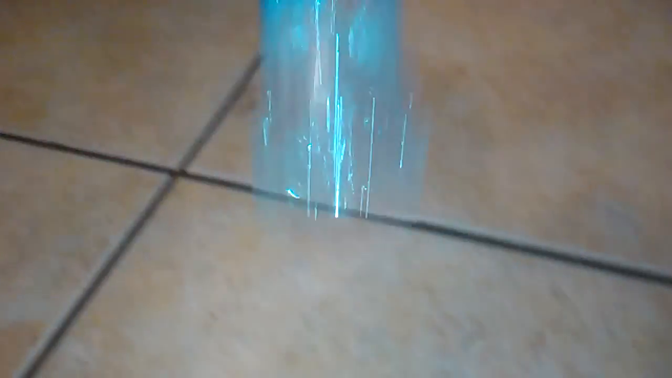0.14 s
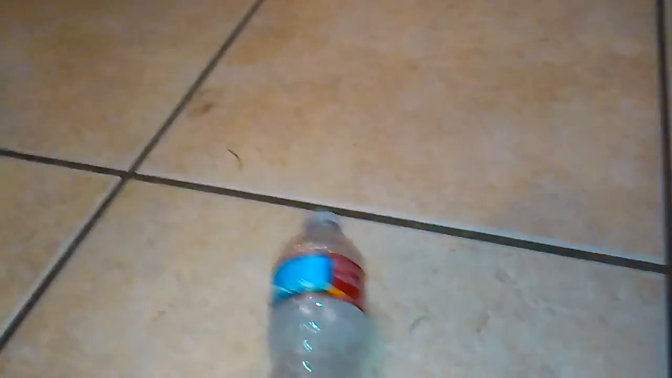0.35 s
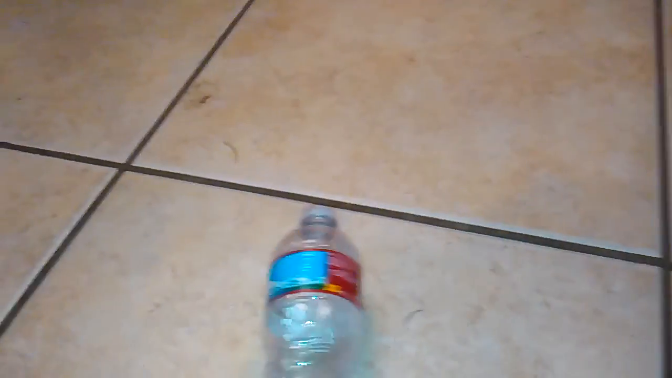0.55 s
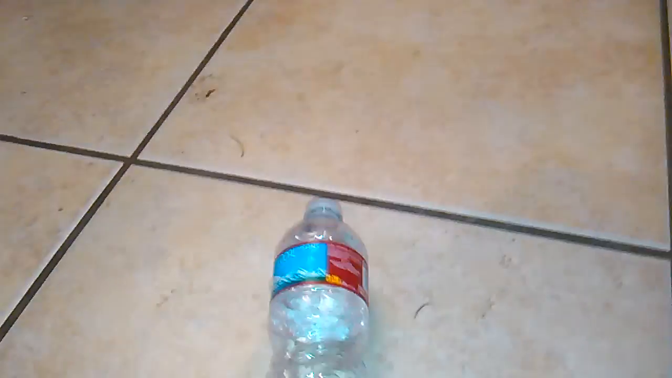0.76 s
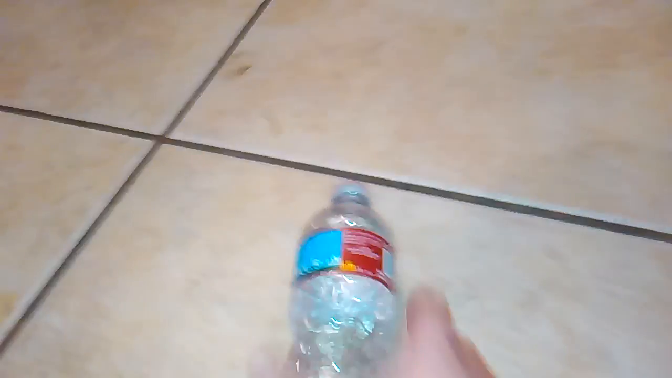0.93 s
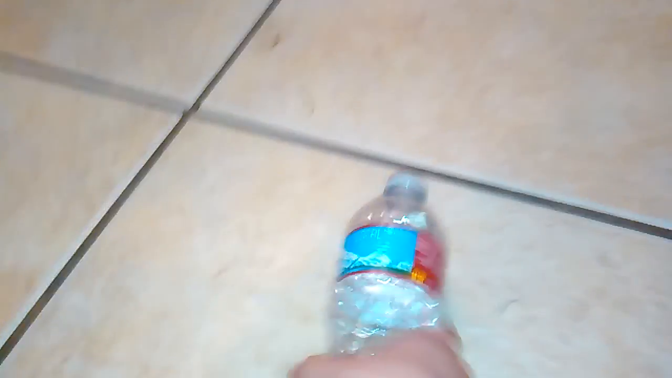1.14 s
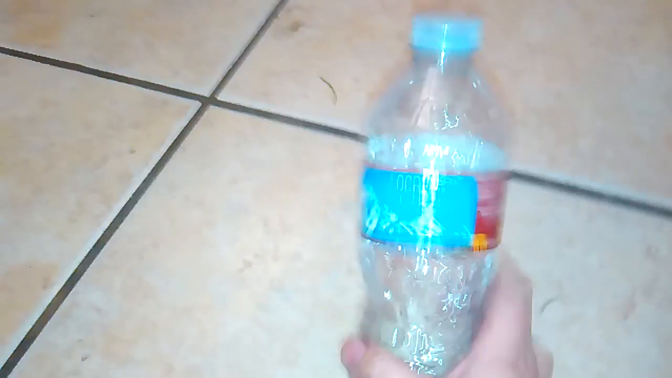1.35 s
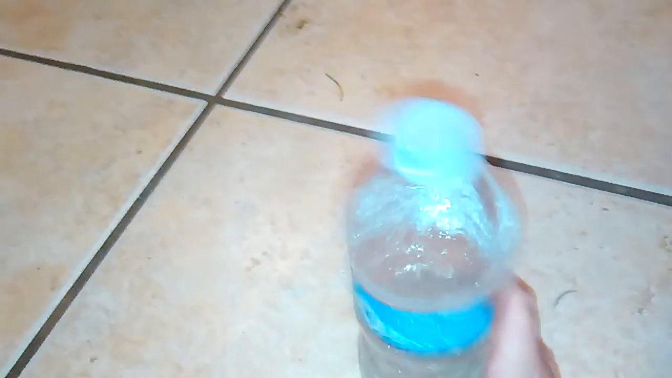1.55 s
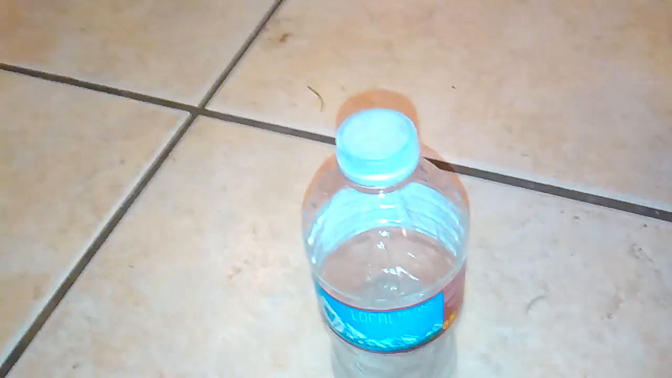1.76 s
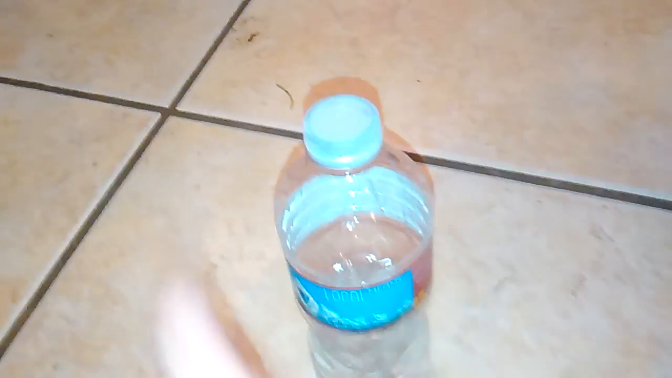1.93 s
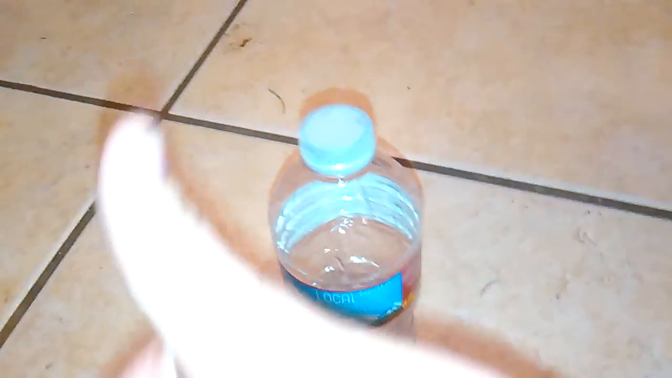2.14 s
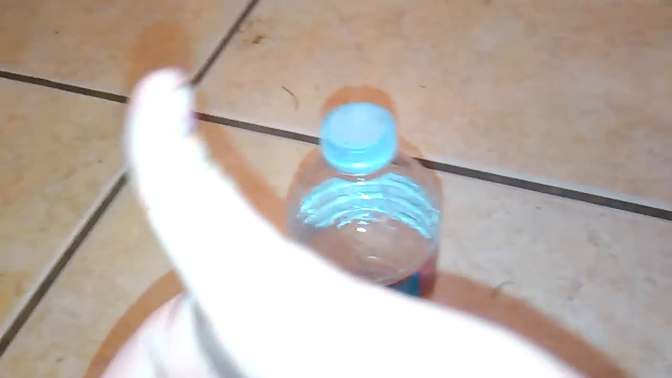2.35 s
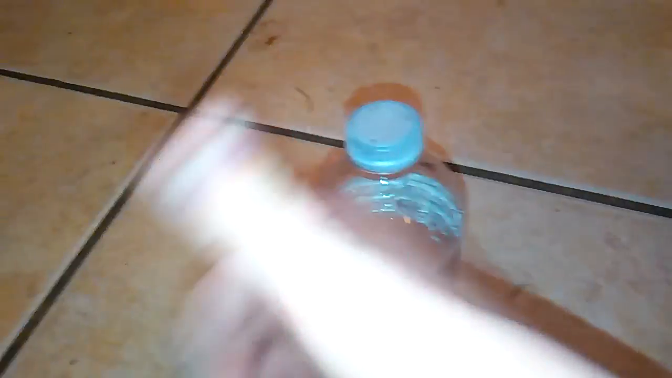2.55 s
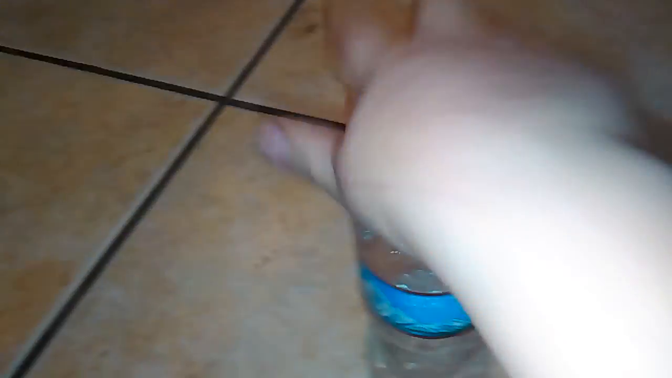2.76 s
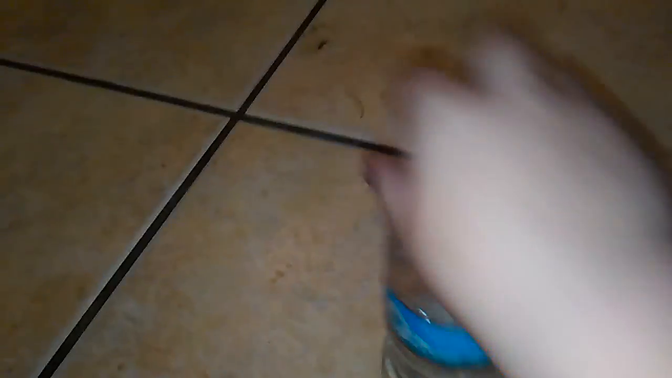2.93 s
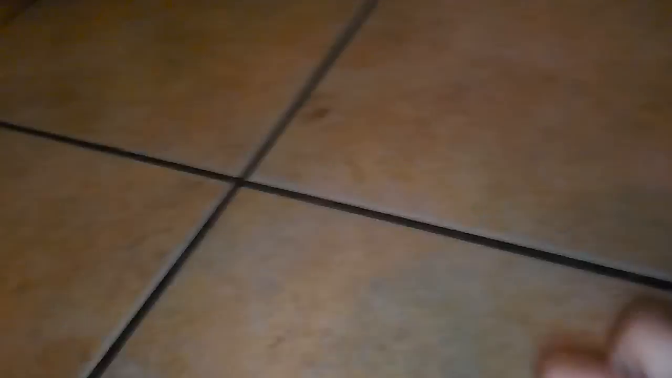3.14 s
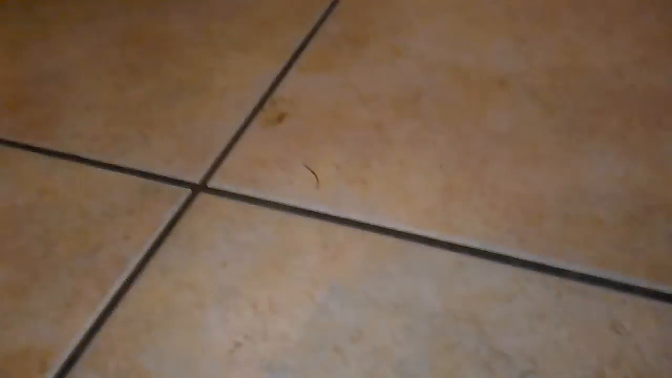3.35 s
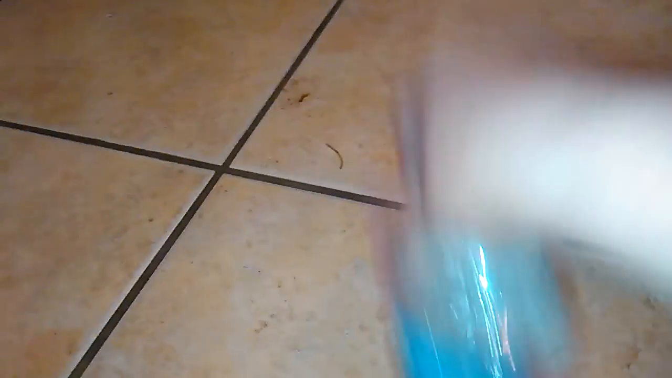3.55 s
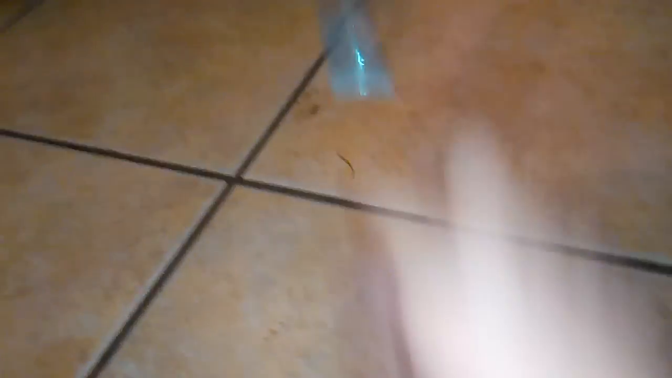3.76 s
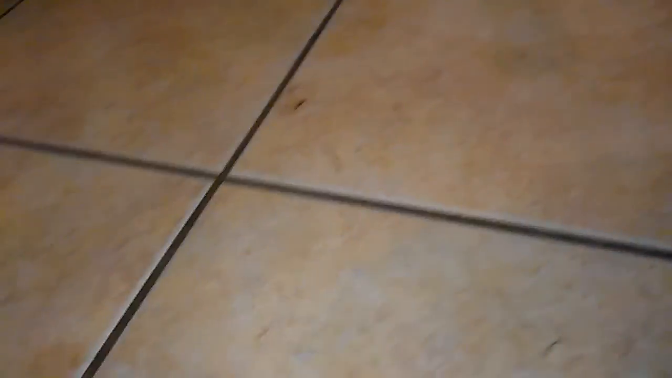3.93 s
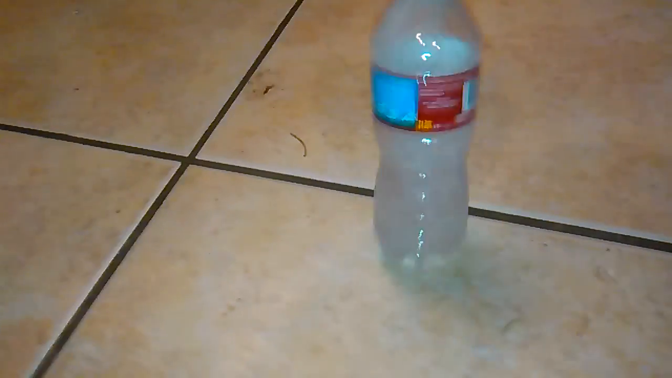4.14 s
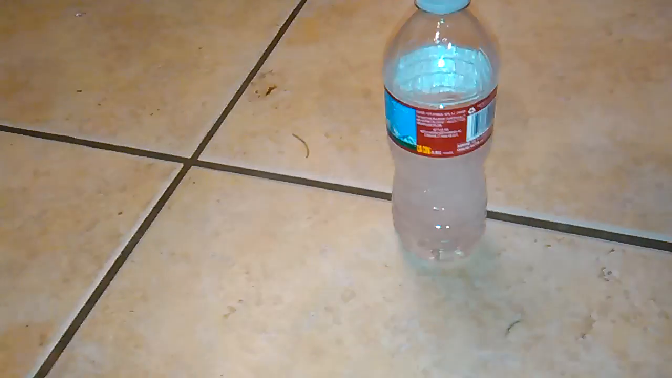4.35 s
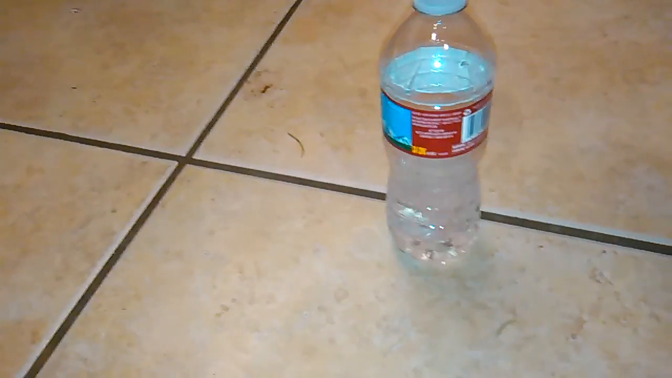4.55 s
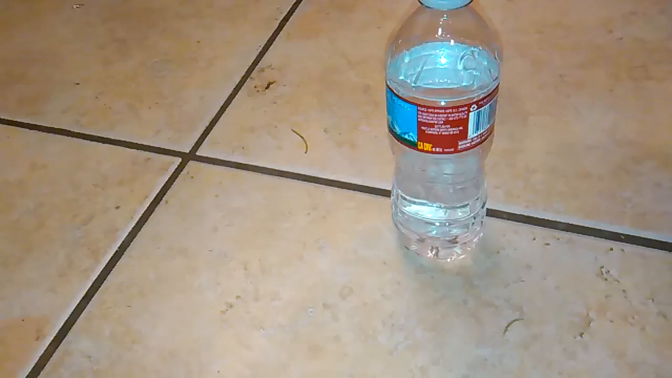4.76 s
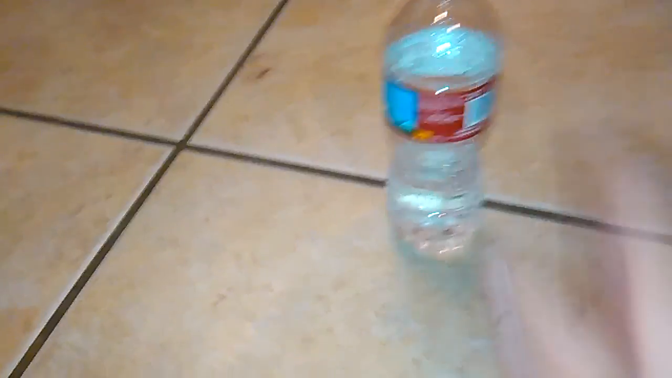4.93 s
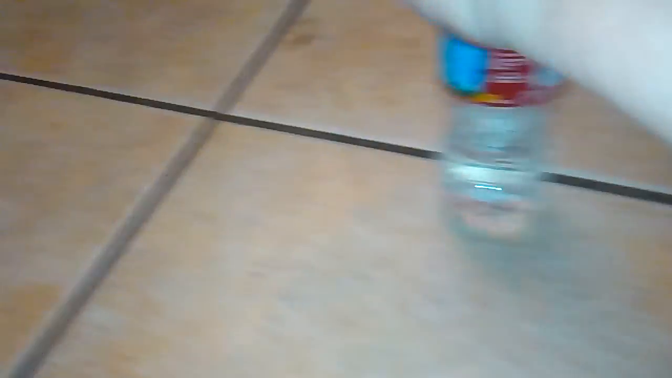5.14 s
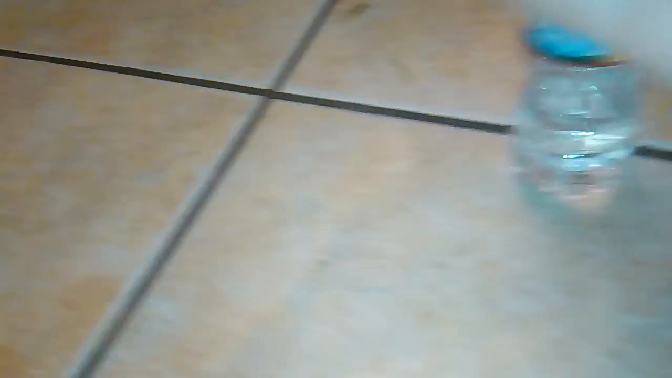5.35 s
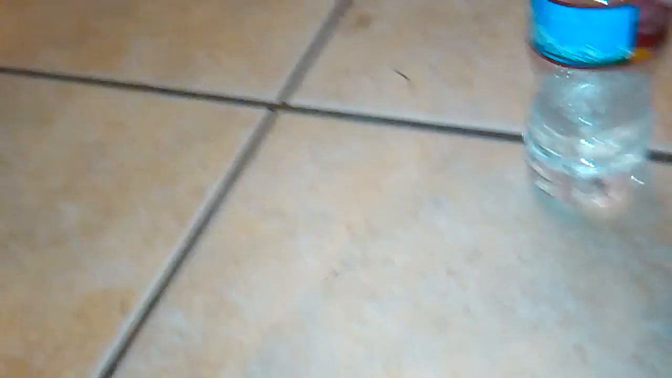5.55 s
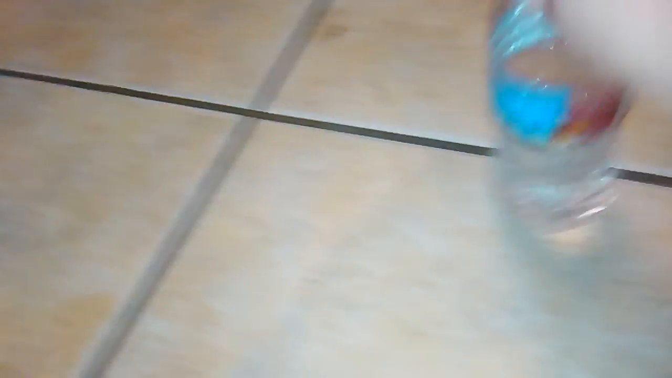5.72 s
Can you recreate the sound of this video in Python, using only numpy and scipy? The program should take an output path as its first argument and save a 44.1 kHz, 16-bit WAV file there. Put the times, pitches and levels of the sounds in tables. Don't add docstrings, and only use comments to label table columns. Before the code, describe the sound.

Two loud bottle landings on a tile floor, each a quick cluster of bounces, separated by soft bumps, crinkles and low room hum.

```python
import sys
import numpy as np
from scipy import signal
from scipy.fft import rfft, irfft
from scipy.io import wavfile

SR = 44100
rng = np.random.default_rng(int(sys.argv[2]) if len(sys.argv) > 2 else 0)


def transcribe(signal):
    frames = np.atleast_2d(signal).T
    limited = np.clip(frames, -1, 1)
    pcm = np.round(limited * 32767).astype(np.int16)
    wavfile.write(sys.argv[1], SR, pcm)


def field_ratio(decibels):
    return 10 ** (np.asarray(decibels, dtype=float) / 20)


N = 259749

# (frequency [Hz], left-right likeness [-1 to 1])
PORT_LIKENESS = [(60, 0.91), (130, 0.93), (290, 0.73), (620, 0.25), (1360, 0.03), (2980, -0.02),
                 (6500, -0.04), (14200, 0.01)]
# (frequency [Hz], density [dB per Hz])
CRACK_SPECTRUM = [(1000, -27), (1600, 1), (3000, -6.5), (4600, -12.5), (6300, -10.5), (8500, -8.5),
                  (11000, -12.5), (14500, -21)]
# (frequency [Hz], gain [dB])
HAND_SHADOW = [(60, -3.5), (200, -1), (400, -4), (700, -10), (1250, -14), (2300, -13), (4200, -9.5),
               (6000, -17), (7700, -26.5), (14000, -25.5)]


def rms_one(x):
    return x / np.sqrt(np.mean(x ** 2) + 1e-20)


def at_hz(points, hz):
    table = np.array(points)
    return np.interp(np.log(hz), np.log(table[:, 0]), table[:, 1])


def coloured(x, points):
    size = 4096
    bins_hz = np.maximum(np.arange(size // 2 + 1) * SR / size, 1)
    cepstrum = irfft(np.log(field_ratio(at_hz(points, bins_hz))))
    cepstrum[1:size // 2] *= 2
    cepstrum[size // 2 + 1:] = 0
    response = irfft(np.exp(rfft(cepstrum)))[:size // 2]
    return signal.fftconvolve(x, response)[:len(x)]


def butterworth(x, order, hz, kind):
    return signal.sosfilt(signal.butter(order, hz, kind, fs=SR, output="sos"), x)


def drift(rate_hz):
    r = np.exp(-80 * np.pi * rate_hz / SR)
    slow = signal.lfilter([1], [1, -2 * r, r * r], rng.standard_normal(N // 40 + 2002))[2000:]
    return np.interp(np.arange(N) / 40, np.arange(len(slow)), rms_one(slow))


def ring(clicks, hz, t60):
    r = field_ratio(-60 / (t60 * SR))
    w = 2 * np.pi * hz / SR
    return signal.lfilter([0, np.sin(w)], [1, -2 * r * np.cos(w), r * r], clicks + 1e-18)


def grains(per_s, size_db, clump_db):
    sizes = field_ratio(size_db * np.minimum(rng.exponential(1, N), 4)) * rng.choice([-1, 1], N)
    return sizes * (rng.random(N) < per_s * field_ratio(clump_db * drift(25)) / SR)


def swell(t, middle_s, length_s):
    return np.cos(np.pi * np.clip((t - middle_s) / length_s, -.5, .5))


def add(out, s, piece):
    i = round(s * SR)
    out[i:i + len(piece)] += piece[:N - i]


def rumble(patchy_db=3.0):
    # (frequency [Hz], density [dB per Hz])
    rumble_spectrum = [(15, -46), (25, -15), (59, -2), (91, -10.5), (101, -7), (124, -11), (147, -15),
                       (186, -8), (278, -21.5), (307, -16.5), (476, -23.5), (573, -24.5), (1400, -34),
                       (1820, -68.5), (3080, -120)]
    # (frequency [Hz], left minus right [dB])
    rumble_lean = [(60, 3), (110, -2.5), (200, -2.5), (370, -4.5), (680, -3.5), (1250, -6.5), (2290, -2.5),
                   (4210, -2), (7730, -10.5), (14200, -4)]
    out = 0
    edges = 25 * 2 ** np.arange(0, 6.6, .5)
    white = rng.standard_normal((2, 2, N))
    for k, (low, high) in enumerate(zip(edges, edges[1:])):
        mid, side = butterworth(white[k % 2], 2, [low, high], "band")
        hz = np.sqrt(low * high)
        alike = np.clip(at_hz(PORT_LIKENESS, hz), 0, 1)
        lean_db = at_hz(rumble_lean, hz) * np.array([[.5], [-.5]])
        gain = field_ratio(at_hz(rumble_spectrum, hz) + patchy_db * alike * drift(5) + lean_db)
        out = out + gain * (np.sqrt(1 + alike) * mid + np.sqrt(1 - alike) * side * [[1], [-1]])
    return field_ratio(-67.5) * rms_one(out)


def mains_hum(waver_db=2.5, waver_hz=5.0):
    # (frequency [Hz], level [dB rms])
    harmonics = [(59.5, -69.5), (119.5, -70.5), (180, -84)]
    t, hum = np.arange(N) / SR, 0
    for hz, db in harmonics:
        hum = hum + field_ratio(db + 1.5 + waver_db * drift(waver_hz)) * np.sin(2 * np.pi * hz * t)
    return hum * field_ratio([[-1.1], [1.1]])


def capsule_hiss():
    # (frequency [Hz], density [dB per Hz])
    hiss_spectrum = [(820, -32.5), (1400, -2), (1470, -11), (1820, -0.5), (2980, -3.5), (6480, -8.5),
                     (8330, -3), (14200, -3.5)]
    return np.array([field_ratio(-75) * rms_one(coloured(rng.standard_normal(N), hiss_spectrum)) for port in "LR"])


def all_contacts():
    # (time [s], wall [dB], base [dB], base pitch [Hz], crack [dB])
    landings = [
        (0.3195, -10, -18.5, 108, -30),
        (0.328, -16, -21, 180, -31.5),
        (0.348, -19.5, -20, 217, -39.5),
        (0.369, -15, -22.5, 163, -31),
        (0.378, -25, -27.5, 208.8, -33),
        (4.2125, -17, -12.5, 126.4, -40.5),
        (4.2165, -17.5, -16.5, 88, -22.5),
        (4.224, -9.5, -19, 203, -33.5),
        (4.235, -21, -21.5, 258, -32),
        (4.257, -31.5, -29, 80.6, -44),
    ]
    # (time [s], wall [dB], base [dB], base pitch [Hz], crack [dB])
    knocks = [(0.1, -51.5, -57.5, 116, -64), (0.124, -43.5, -59.5, 132, -53),
              (0.151, -58.5, -71.5, 110.4, -60), (0.233, -59, -63, 80.7, -64.5),
              (1.504, -41.5, -31.5, 326, -57.5), (1.514, -35, -31, 126.6, -66.5),
              (1.534, -41.5, -41, 203, -57), (1.612, -49, -64, 127, -67), (1.637, -50.5, -55, 218, -55.5),
              (1.666, -48.5, -66, 121.5, -59), (2.702, -43.5, -38, 282.5, -69.5),
              (2.719, -38, -32.5, 223, -58), (2.859, -44.5, -41.5, 217, -61),
              (2.873, -34.5, -44, 172, -58.5), (3.824, -38, -33, 194, -62), (3.99, -35, -41, 95.9, -47.5),
              (4.031, -30, -47, 99.6, -46.5), (4.04, -37, -46, 105, -58), (5.525, -52, -41.5, 362, -71),
              (5.532, -36, -31.5, 363, -69), (5.605, -58, -45, 296, -71), (5.785, -29.5, -50.5, 233, -32.5),
              (5.805, -39.5, -43, 229, -53)]
    # (time [s], base [dB], base pitch [Hz])
    bumps = [
        (0.001, -46.5, 213),
        (2.009, -54, 130.4),
        (3.041, -45, 245),
        (5.281, -56, 253.6),
        (5.471, -50, 161),
    ]
    rows = landings + knocks + [(s, db - 25, db, hz, db - 28.5) for s, db, hz in bumps]
    hardest_hz, softer_db_per_octave = 1400, 26.0
    contacts_with_pitch = []
    for s, wall_db, base_db, base_hz, crack_db in rows:
        wall_hz = hardest_hz * 2 ** ((crack_db - wall_db) / softer_db_per_octave)
        contacts_with_pitch.append((s, wall_db, base_db, base_hz, wall_hz, crack_db))
    return contacts_with_pitch


def contacts(base_t60=0.06, wall_t60=0.017, crack_s=0.0054, spray_s=0.017, spray_db=-14):
    # (frequency [Hz], level below the base [dB], t60 [s])
    base_modes = [(59.55, -3.5, 0.37), (80.5, -4.5, 0.21), (139, -9.5, 0.067), (188.4, -4, 0.16),
                  (263, -7, 0.02), (319.44, -6.5, 0.014)]
    # (frequency [Hz], level below the wall [dB], t60 [s])
    wall_modes = [(404, -6, .05), (455, -4, .06), (560, -11, .04), (655, -8, .04), (817, -6, .04),
                  (958, -8, .035), (1095, -6, .035), (1180, -6, .035), (1310, -8, .03), (1830, -17, .02),
                  (2150, -19, .015)]
    spread_db, focus_db, thin_db = 5.5, 5.5, 4.5
    counts = [len(base_modes), len(wall_modes)]
    is_wall = np.repeat([0, 1], counts)[:, None]
    body, crack, t = np.zeros(N), np.zeros(N), np.arange(SR // 4) / SR
    for s, wall_db, base_db, base_hz, wall_hz, crack_db in all_contacts():
        modes = [(base_hz, base_db + 2.5, base_t60), (wall_hz, wall_db + 6.5, wall_t60)]
        modes += [(hz, base_db + db - 4, t60) for hz, db, t60 in base_modes]
        modes += [(hz, wall_db + db, t60) for hz, db, t60 in wall_modes]
        hz, db, t60 = np.transpose(modes)[:, :, None]
        own_hz = np.repeat([base_hz, wall_hz], counts)[:, None]
        db[2:] += spread_db * rng.standard_normal((sum(counts), 1))
        db[2:] -= focus_db * np.abs(np.log2(hz[2:] / own_hz))
        db[2:] -= thin_db * np.maximum(np.log2(wall_hz / hz[2:]), 0) * is_wall
        hz[2:] *= 1 + .025 * rng.standard_normal((sum(counts), 1))
        swing = -np.sum(field_ratio(db - 60 * t / t60) * np.sin(2 * np.pi * hz * t), axis=0)
        add(body, s, swing * (1 - np.exp(-(t / 0.0015) ** 2)))
        decay = np.exp(-t / crack_s) + field_ratio(spray_db) * np.exp(-t / spray_s)
        add(crack, s, field_ratio(crack_db) * rng.standard_normal(len(t)) * np.minimum(t / 0.00021, 1) * decay)
    unit = np.std(coloured(rng.standard_normal(SR), CRACK_SPECTRUM))
    return body + field_ratio(3.0) * coloured(crack, CRACK_SPECTRUM) / unit


def dying(t, late_s, t60):
    t = np.maximum(t, 0)
    return (1 - np.exp(-(t / late_s) ** 2)) * field_ratio(-60 * t / t60) ** 2


def agitation():
    # (middle [s], length [s], slosh [dB], crackle [dB])
    stirs = [(0.08, 0.21, -71, -69), (0.244, 0.27, -67, -79), (0.392, 0.12, -38.5, -43),
             (0.441, 0.049, -41, -65), (0.698, 0.29, -75, -73.5), (1.147, 0.34, -65.5, -73),
             (1.441, 0.24, -75, -72.5), (1.653, 0.11, -58.5, -61.5), (1.732, 0.086, -62.5, -64.5),
             (1.541, 0.11, -49.5, -54), (3.042, 0.25, -65.5, -83), (3.82, 0.18, -60.5, -67.5),
             (3.95, .12, -64, -75.5), (4.15, 0.3, -76, -77.5), (4.4, 0.265, -53, -67.5),
             (4.52, 0.23, -65, -75.5), (5.3, .16, -77.5, -79), (5.46, 0.24, -62.5, -77),
             (5.585, 0.24, -53, -73), (5.776, 0.073, -60.5, -78), (5.87, 0.09, -63, -93)]
    t, power = np.arange(0, N + 64, 32) / SR, 0
    for s, wall_db, base_db, _, _, crack_db in all_contacts():
        blow_db = max(wall_db - 11, base_db)
        slosh = field_ratio(blow_db - 11.5) ** 2 * dying(t - s, 0.0064, 0.21)
        crackle = field_ratio(crack_db - 16) ** 2 * dying(t - s, .01, 0.28)
        power = power + np.array([slosh, crackle])
    for s, length, slosh_db, crackle_db in stirs:
        power = power + (field_ratio([[slosh_db], [crackle_db]]) * swell(t, s, length)) ** 2
    return [np.interp(np.arange(N) / SR, t, np.sqrt(p)) for p in power]


def slosh_and_crackle():
    # (frequency [Hz], density [dB per Hz])
    slosh_spectrum = [(150, -28.5), (250, -10), (420, -6.5), (700, -10), (950, -14.5), (1250, -13),
                      (1600, -27.5), (2800, -26), (4500, -64), (7700, -110)]
    slosh, crackle = agitation()
    knocks = grains(2500, size_db=3.5, clump_db=3.5)
    dealt = rng.integers(0, 14, N)
    rings = 0
    for k, hz in enumerate(np.geomspace(280, 3000, 14)):
        rings = rings + np.sqrt(hz) * ring(knocks * (dealt == k), hz, 14.0 / hz)
    water = coloured(rings, slosh_spectrum)
    creases = coloured(grains(6000, size_db=8.0, clump_db=4.5), CRACK_SPECTRUM)
    creases = butterworth(creases, 2, 4500, "high")
    return field_ratio(-5.5) * slosh * rms_one(water) + field_ratio(-2.5) * crackle * rms_one(creases)


def rubs(per_s=700, cycles=22.0):
    # (middle [s], length [s], level [dB])
    strokes = [
        (0.106, 0.067, -67),
        (1.535, .1, -66.5),
        (1.639, 0.055, -59),
        (1.741, 0.051, -60),
        (2.721, 0.048, -63),
        (2.865, 0.034, -82),
        (4.045, 0.074, -63),
        (5.535, 0.039, -64.5),
    ]
    rib_pitches = [1782, 2065, 2180, 2660]
    t, level, rings = np.arange(N) / SR, 0, 0
    for s, length, db in strokes:
        level = level + field_ratio(db) * swell(t, s, length)
    slips = grains(per_s, size_db=4.0, clump_db=7.5)
    dealt = rng.integers(0, len(rib_pitches), N)
    for k, hz in enumerate(rib_pitches):
        rings = rings + ring(slips * (dealt == k), hz, cycles / hz)
    return level * rms_one(rings)


def ticks(length_s=0.0042):
    # (time [s], peak [dB], pitch [Hz])
    snaps = [(0.08, -49.5, 10900), (0.093, -53, 6850), (0.111, -48, 8700), (0.2027, -63, 9400),
             (0.2209, -59, 4200), (0.671, -55.5, 9150), (0.6984, -64, 5870), (1.1657, -59.5, 10600),
             (1.2442, -68.5, 8150), (1.416, -62, 10340), (1.486, -61, 6240), (1.521, -41.5, 8860),
             (1.566, -48, 8500), (1.6229, -44.5, 8900), (1.6918, -75, 8820), (1.722, -55, 7680),
             (1.8123, -51, 11350), (2.85, -48, 8300), (3.6374, -68, 9750), (3.7006, -58.5, 6840),
             (3.936, -64.5, 6980), (3.9726, -66, 8900), (4.06, -60, 9350), (4.38, -61, 10240),
             (4.49, -56.5, 7520), (4.5301, -60, 8990), (4.8866, -73, 8330), (5.655, -54.5, 7940),
             (0.4145, -33.5, 4220), (4.493, -60, 2440)]
    out, t = np.zeros(N), np.arange(SR // 50) / SR
    for s, peak_db, hz in snaps:
        burst = rng.standard_normal(len(t)) * np.exp(-t / length_s)
        tick = ring(ring(burst, hz, 9.0 / hz), hz, 9.0 / hz)
        add(out, s, field_ratio(peak_db + 2.5) * tick / np.abs(tick).max())
    return out


def gulps():
    # (time [s], peak [dB], start pitch [Hz], end pitch [Hz], length [s])
    pockets = [
        (0.22, -76.5, 4780, 3970, 0.0071),
        (3.744, -71, 762, 810, 0.042),
        (3.775, -54, 670, 1211, 0.023),
        (5.426, -76, 2830, 2710, 0.077),
    ]
    out = np.zeros(N)
    for s, peak_db, start_hz, end_hz, length in pockets:
        hz = np.linspace(start_hz, end_hz, round(length * SR))
        rough = 1 + 2.5 * np.interp(np.arange(len(hz)) / 90, np.arange(60), rng.standard_normal(60))
        tone = np.sin(2 * np.pi * np.cumsum(hz) / SR)
        add(out, s, field_ratio(peak_db) * np.hanning(len(hz)) * rough * tone)
    return out


def air_ring():
    # (time [s], peak [dB], pitch [Hz], t60 [s])
    hums = [
        (0.33, -46, 942, 0.63),
        (2.722, -48, 690, .2),
        (3.828, -45, 348.8, 0.19),
        (5.54, -47.5, 679, 0.21),
    ]
    t, out = np.arange(SR // 2) / SR, np.zeros(N)
    for s, peak_db, hz, t60 in hums:
        add(out, s, field_ratio(peak_db - 60 * t / t60) * np.sin(2 * np.pi * hz * t))
    return out


def cap_slap():
    # (time [s], spike [dB], swing [dB], swing pitch [Hz], snap [dB])
    slaps = [
        (0.4153, -9, -9.5, 49.3, -19),
    ]
    t, out = np.arange(SR // 5) / SR, np.zeros(N)
    rise_s = .0008
    late = np.maximum(t - rise_s, 0)
    for s, spike_db, swing_db, swing_hz, snap_db in slaps:
        turns = swing_hz * late + .35 * (1 - np.exp(-late / .0045))
        swing = field_ratio(swing_db) * np.exp(-late / .0125) * np.cos(2 * np.pi * turns)
        spike = field_ratio(spike_db) * np.exp(-late / .00016)
        snap = field_ratio(snap_db) * np.diff(rng.standard_normal(len(t) + 1)) * np.exp(-late / 0.00029)
        add(out, s, np.minimum(t / rise_s, 1) ** 3 * (spike + swing + snap))
    return out


def room(x, first_echo_s=0.01):
    # (frequency [Hz], t60 [s])
    room_t60 = [(70, 0.3), (200, .34), (600, 0.31), (1800, 0.36), (5000, 0.11), (12000, 0.33)]
    t, echoes = np.arange(SR // 2) / SR, 0
    for low in 40 * 2.0 ** np.arange(9):
        noise = rng.standard_normal((3, len(t)))
        shared, left, right = butterworth(noise, 1, [low, 2 * low], "band")
        alike = np.clip(at_hz(PORT_LIKENESS, 1.4 * low), 0, 1)
        band = np.sqrt(alike) * shared + np.sqrt(1 - alike) * np.array([left, right])
        echoes = echoes + band * field_ratio(-60 * t / at_hz(room_t60, 1.4 * low))
    echoes = echoes * np.minimum(t / first_echo_s, 1) ** 2
    return signal.fftconvolve(x[None], echoes / np.linalg.norm(echoes[1]), axes=1)[:, :N]


def round_the_hand(x, lag_s=.0001, scatter_db=4.5, scatter_s=0.0028):
    n = np.arange(SR // 40)
    paths = rng.standard_normal(len(n)) * np.exp(-n / (scatter_s * SR))
    paths = butterworth(paths / np.linalg.norm(paths), 1, 1500, "high")
    direct = np.interp(np.arange(N) - lag_s * SR, np.arange(N), x)
    smear = signal.fftconvolve(direct, paths)[:N]
    return coloured(direct + field_ratio(scatter_db) * smear, HAND_SHADOW)


def scene():
    near = contacts() + slosh_and_crackle() + rubs() + ticks() + gulps() + air_ring()
    cap = cap_slap()
    wet = field_ratio(-11) * room(near + field_ratio(-18) * cap)
    left = round_the_hand(near + field_ratio(-24.5) * cap)
    echo_shadow = [(hz, 0.92 * db) for hz, db in HAND_SHADOW]
    left = left + coloured(wet[0], echo_shadow)
    right = near + cap + wet[1]
    return field_ratio(2.5) * np.array([left, right]) + rumble() + mains_hum() + capsule_hiss()


def band_limit(x):
    return signal.sosfilt(signal.butter(12, 14780, fs=SR, output="sos"), x)


def record(dry):
    bass_cut = butterworth(dry, 2, 66, "high")
    rounded = 1.5 * np.tanh(bass_cut / 1.5)
    mix = signal.sosfilt(signal.cheby2(18, 50, 14620, fs=SR, output="sos"), rounded)
    return band_limit(mix)


dry = scene()
out = record(dry)
transcribe(out)
```